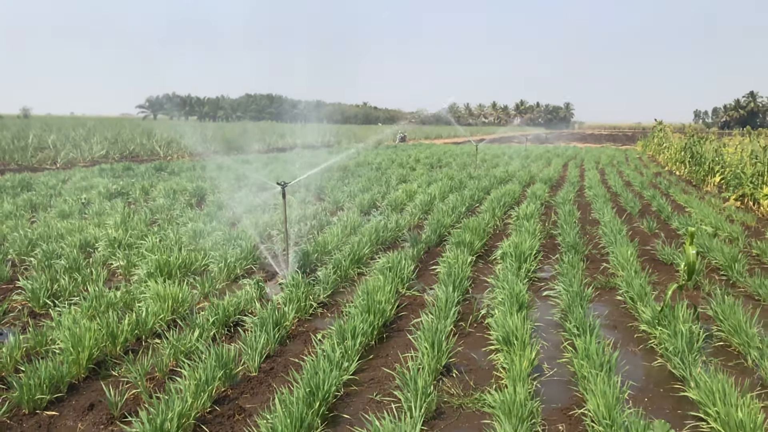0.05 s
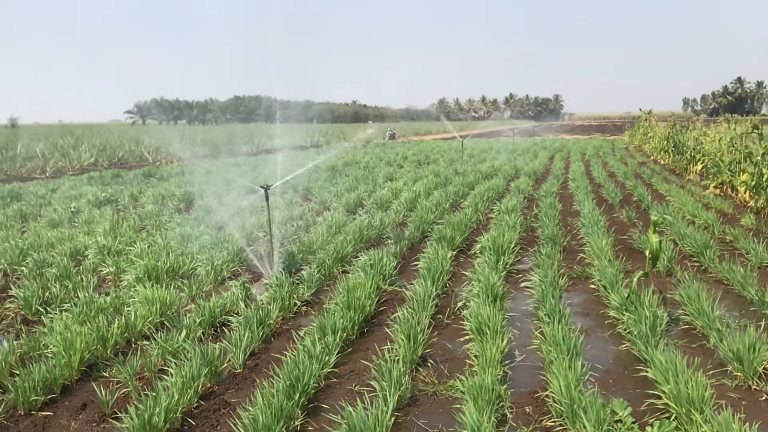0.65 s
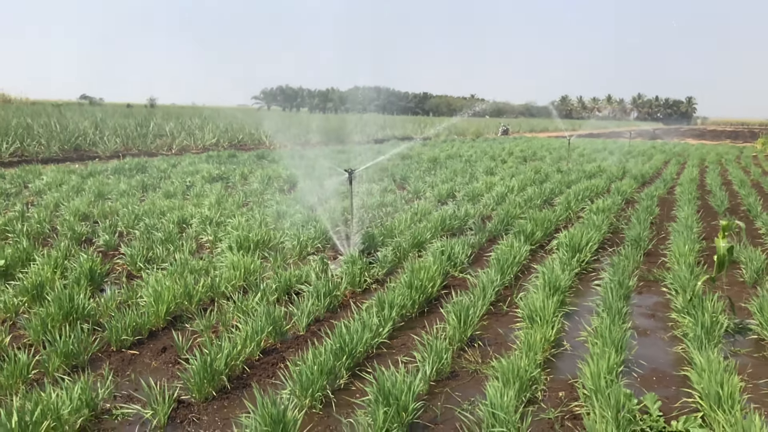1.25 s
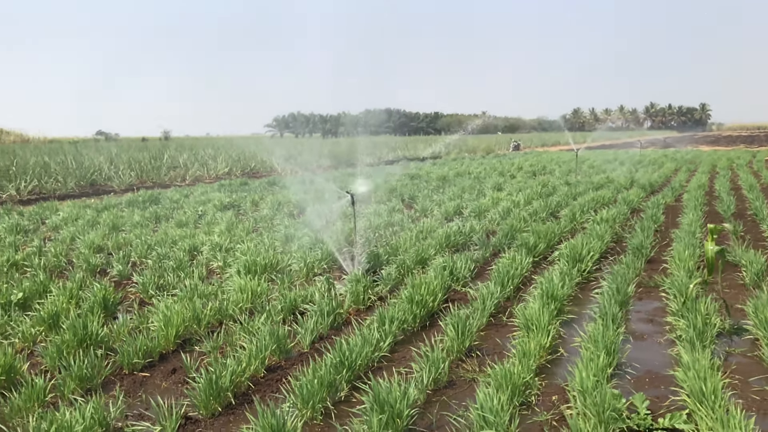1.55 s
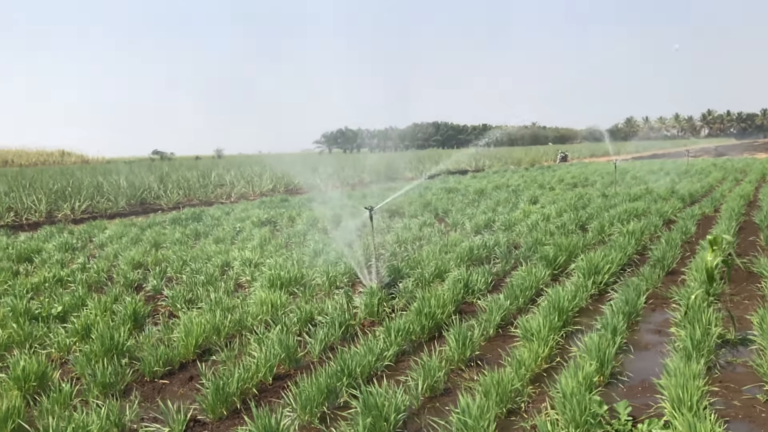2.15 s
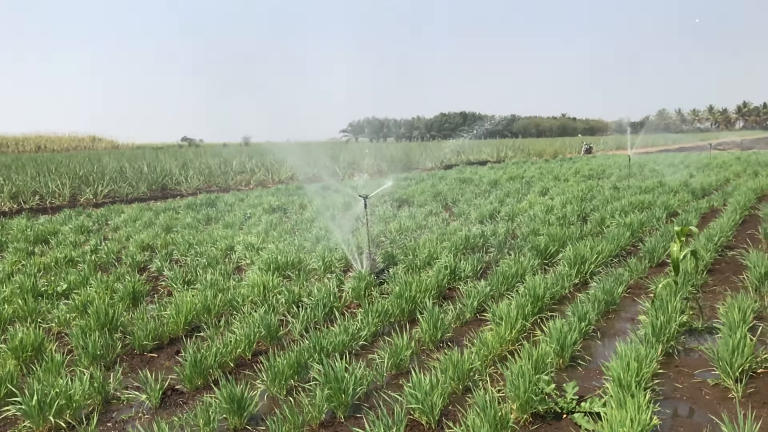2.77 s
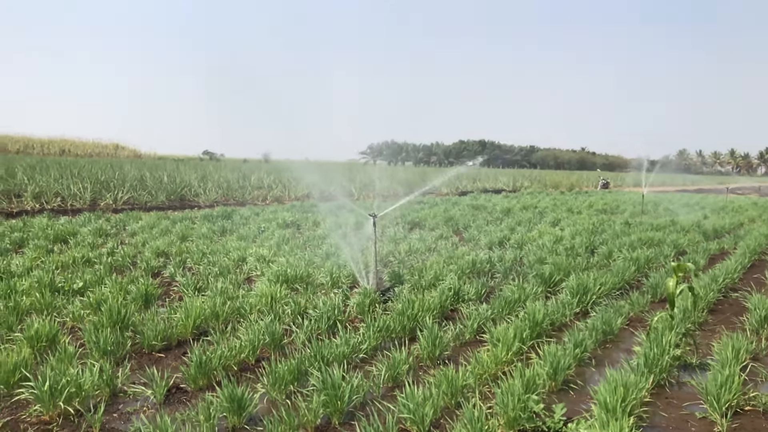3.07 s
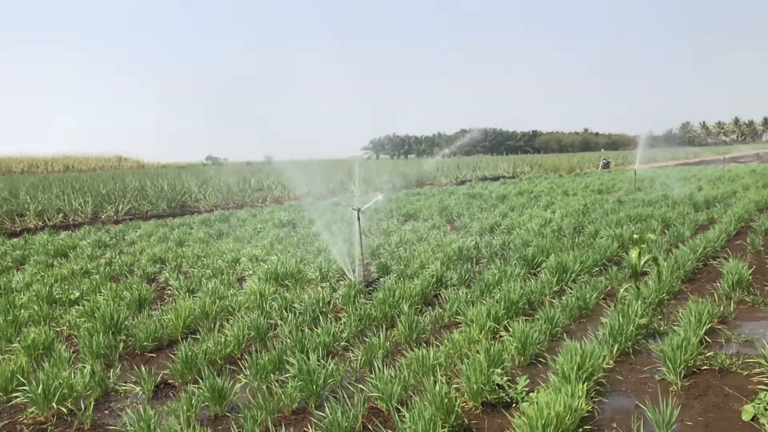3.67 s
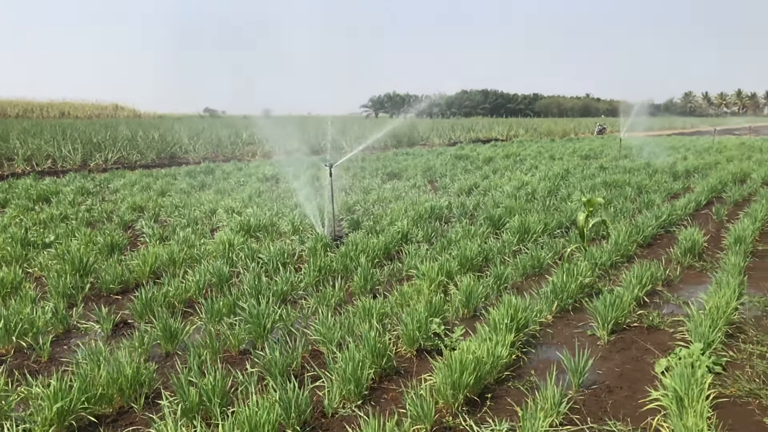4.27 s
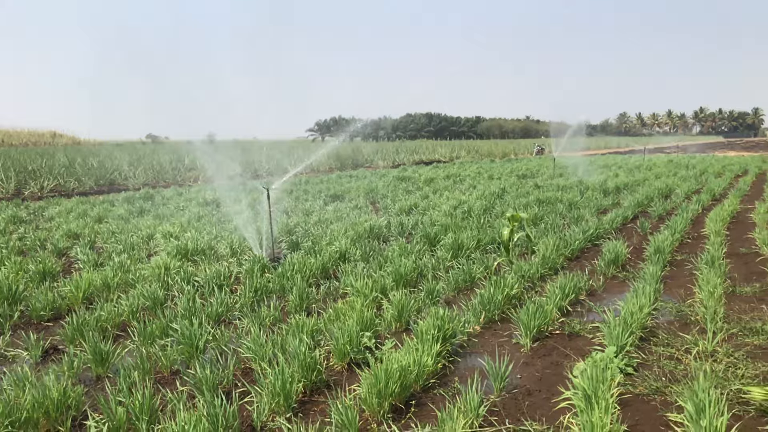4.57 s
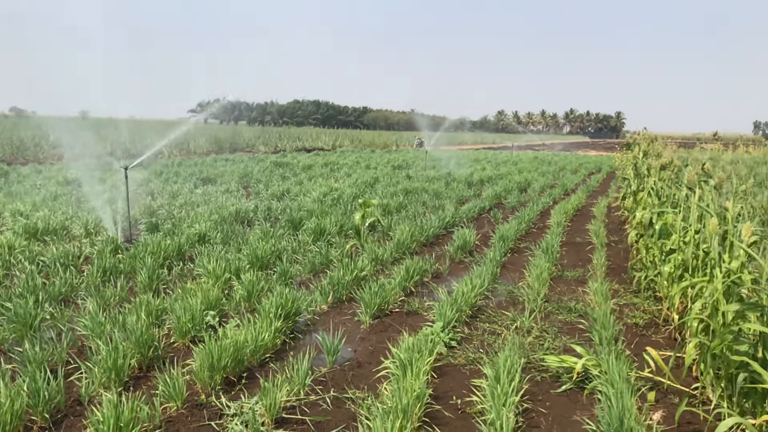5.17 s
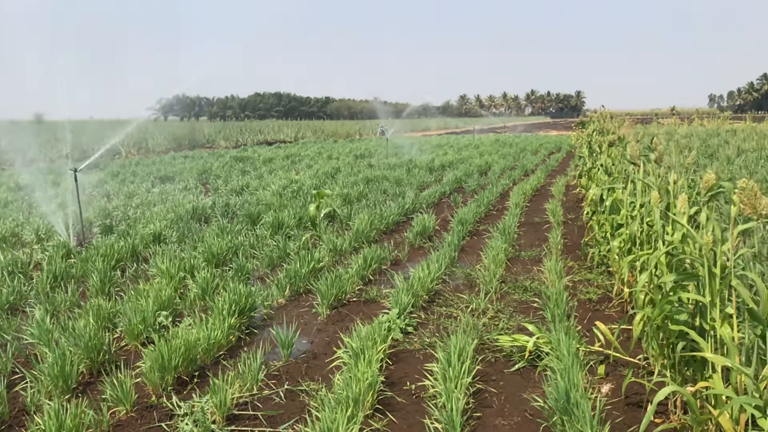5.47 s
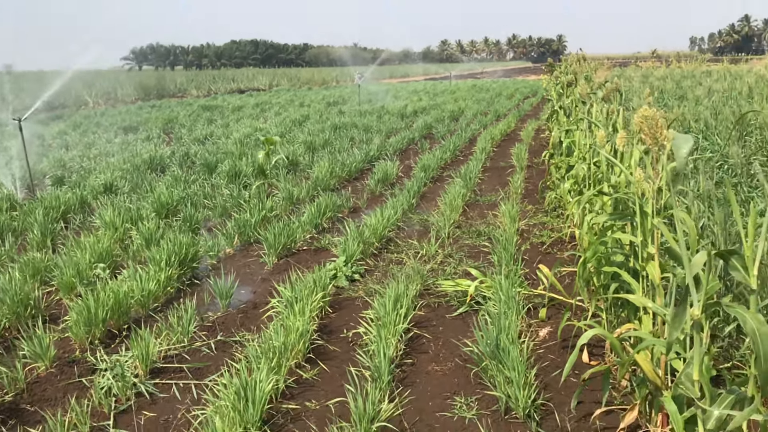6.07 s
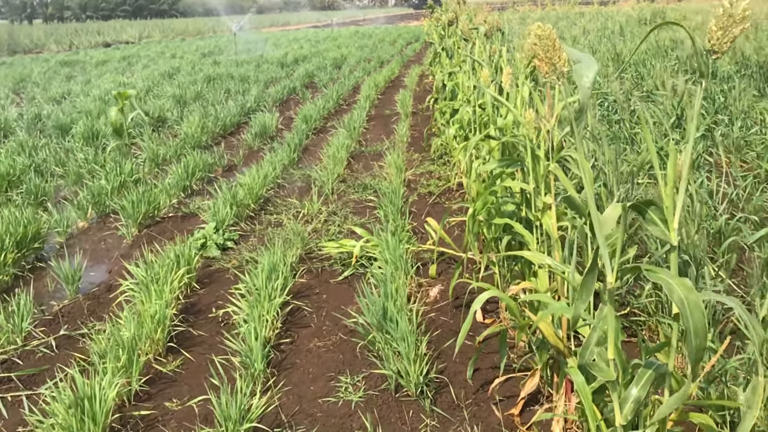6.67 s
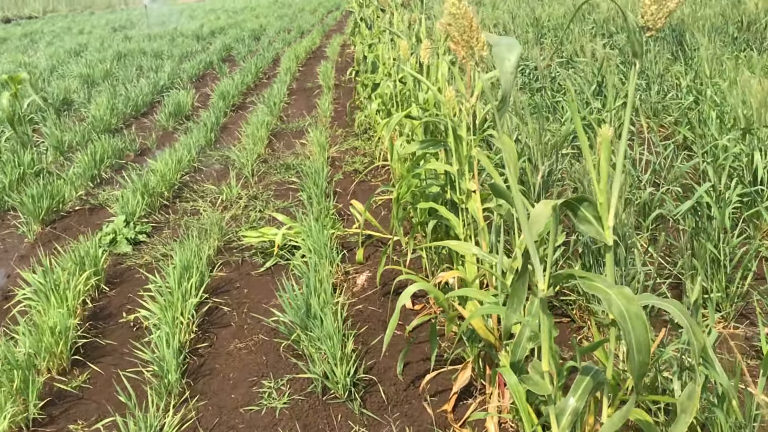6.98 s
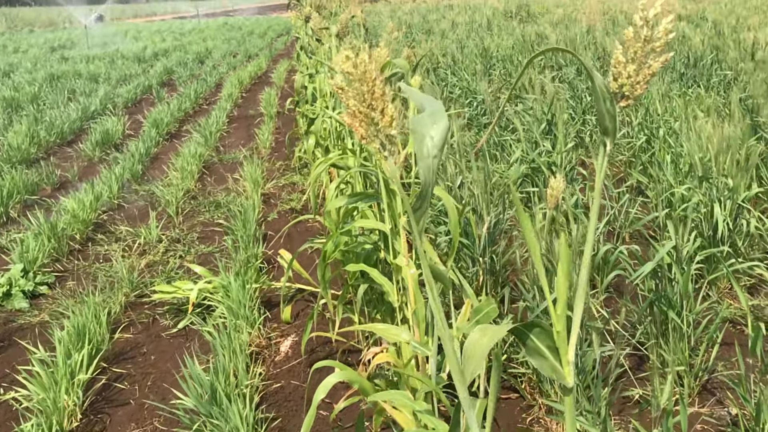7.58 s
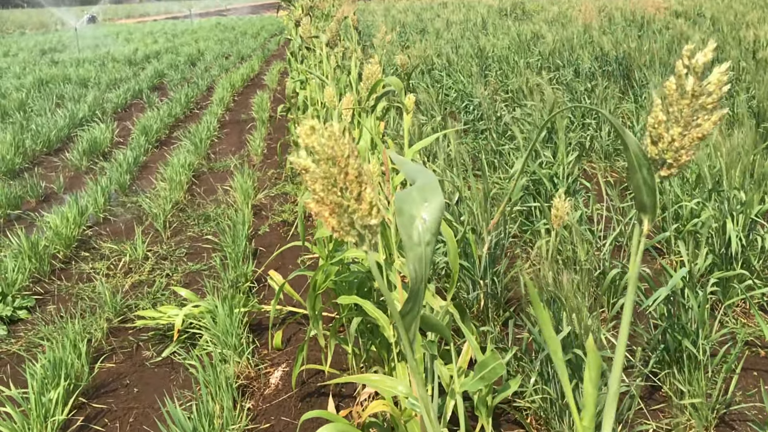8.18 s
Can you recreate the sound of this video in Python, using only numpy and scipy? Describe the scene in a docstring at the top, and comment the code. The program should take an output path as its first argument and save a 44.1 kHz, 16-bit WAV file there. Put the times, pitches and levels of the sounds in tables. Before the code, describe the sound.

Regular sharp ticks and a watery hiss come from a field sprinkler, easing slightly as spray and a few heavy drops land on crops.

```python
"""An impact sprinkler waters a crop field: about four times a second its arm knocks into the hissing jet,
chops the water and knocks again, mirrored by the wet ground. Spray patters on leaves and a second
sprinkler ticks further off, over the low noise of open land. From 1.3 s light wind nudges the phone, and
from 2.9 s heavy drops land close by. As the walker carries the phone away, sprinkler and spray slowly
fade; from 5 s stray drops tick on the tall crop, and just after 7 s a leaf brushes past."""
import sys
import numpy as np
from scipy import signal
from scipy.fft import rfft, irfft
from scipy.io import wavfile
from scipy.ndimage import uniform_filter1d

SR = 44100
rng = np.random.default_rng(int(sys.argv[2]) if len(sys.argv) > 2 else 0)


def unload_wav(signal):
    """Save mono or channel-first audio to the path in sys.argv[1] as 16-bit WAV at rate SR, clipped to [-1, 1]."""
    wavfile.write(
        sys.argv[1],
        SR,
        np.round(np.clip(np.atleast_2d(signal).T, -1, 1) * 32767).astype(np.int16),
    )


N = 367353
T = np.arange(N) / SR

# the walk away from the sprinkler: time_s, distance_m
WALK_PATH = [(0, 5.75), (.43, 6.18), (1.3, 6.72), (2.1, 6.89), (4.7, 8.42), (5.6, 8.52), (6.5, 9.17),
             (7.6, 8.68), (8.33, 8.87)]


def sprinkler_arm(knock_gain_db=2, splash_gain_db=-16.5, skirt_db=-10, dwell_s=.015):
    """The arm grazes the jet, knocks, throws water sideways, knocks again and lets the drops scatter."""
    # the two knocks of each stroke, entering and leaving the jet: start_s, entry_db, exit_db
    strokes = [(.016, -36.5, -32), (.212, -34, -42), (.431, -41, -45), (.674, -36, -46), (.918, -42, -47),
               (1.161, -37, -43), (1.401, -30.5, -36), (1.635, -32, -35), (1.871, -40, -38),
               (2.114, -39, -46), (2.348, -35, -39), (2.59, -29.5, -48), (2.837, -35, -37),
               (3.069, -34, -31), (3.26, -37, -40), (3.495, -37, -45), (3.736, -35, -46), (3.977, -36, -38),
               (4.209, -41, -42), (4.44, -41, -52), (4.678, -36, -40), (4.909, -35, -37.5),
               (5.135, -42, -35), (5.365, -36, -42), (5.6, -34, -49), (5.841, -39, -47), (6.068, -41, -43),
               (6.308, -40, -48), (6.543, -41, -52), (6.771, -42, -36), (6.966, -35, -50),
               (7.195, -39.5, -42), (7.437, -41.5, -49), (7.675, -40, -50), (7.896, -47, -52),
               (8.118, -40, -42)]
    # tone of the metal knock: frequency_hz, relative_db
    knock_spectrum = [(400, -20), (1500, -11.5), (2600, -10.5), (4200, -2), (6300, 1), (9000, -3.5),
                      (12000, 0.5), (15500, -5)]
    # tone of the chopped water: frequency_hz, relative_db
    splash_spectrum = [(500, -13), (2000, -17), (3200, -11.5), (4500, -6), (6300, -0.5), (8700, 2),
                       (11500, -2), (14300, 3.5), (15700, -4)]
    # the sideways splash weakens as the head turns away: time_s, gain_db
    head_turn = [(0, -1.5), (1.8, 0.7), (3.1, 0), (4.2, 0), (4.9, -4), (5.8, -1.5), (8.33, -5)]
    cling_s, rise_s, fall_s = .0011, .0018, .0061  # body of the splash
    graze_s, scatter_s = .016, .017  # its softer, longer skirt
    blows, water = np.zeros(N), np.zeros(N)
    for start_s, entry_db, exit_db in strokes:
        near = slice(max(int((start_s - .05) * SR), 0), int((start_s + .1) * SR))
        since_entry = T[near] - start_s
        since_exit = since_entry - dwell_s
        blows[near] += undb(entry_db) * knock(since_entry) + undb(exit_db) * knock(since_exit)
        before, after = np.maximum(-since_entry, 0), np.maximum(since_exit - cling_s, 0)
        body = np.exp(-before / rise_s - after / fall_s)
        skirt = undb(skirt_db) * np.exp(-before / graze_s - after / scatter_s)
        water[near] += np.maximum(body, skirt)
    metal = colour(blows * rng.standard_normal(N), knock_spectrum)
    splash = colour(water * patter(per_second=14000, spread_db=3.5), splash_spectrum)
    splash_gain = undb(splash_gain_db + curve(head_turn)) * distance_gain()
    return undb(knock_gain_db) * metal + splash_gain * splash


def knock(t, cushion_s=.0013, fade_s=.0021):
    """Envelope of a blow at t = 0, its attack cushioned by water."""
    return np.exp(-np.maximum(-t, 0) / cushion_s - np.maximum(t, 0) / fade_s)


def ground_bounce(x, head_height_m=1.0, phone_height_m=1.4, dull_hz=11000, share_per_m=.076):
    """Wet soil returns a copy, sooner and stronger as the bounce flattens; leaves scatter its top."""
    distance_m = curve(WALK_PATH)
    lag_s = 2 * head_height_m * phone_height_m / distance_m / 343
    share = np.minimum(share_per_m * distance_m, 1)
    dulled = signal.sosfiltfilt(signal.butter(3, dull_hz, fs=SR, output="sos"), x)
    echo = np.interp(T - lag_s, T, dulled)
    return (x + share * echo) / np.hypot(1, share)


def jet(gain_db=-27.5, flutter_db=.9, grain=.77):
    """The jet hisses and breaks into fine droplets; its level flutters a little."""
    # tone of the hiss: frequency_hz, relative_db
    jet_spectrum = [(1000, -25.5), (3000, -11.5), (5000, -11), (6700, -8), (8800, -4.5), (11000, -4.5),
                    (12500, -3.5), (14400, 1), (15700, -7)]
    hiss = unit(rng.standard_normal(N) + grain * patter(per_second=2700, spread_db=2.5))
    return colour(hiss, jet_spectrum) * distance_gain() * undb(gain_db + flutter_db * wander(rate_hz=25))


def turning_away(x, neutral_m=7.23, top_db_per_m=-.5, body_db_per_m=-.94):
    """As the sprinkler head turns away during the walk, its hiss and knocks sound duller and thinner."""
    extra_m = curve(WALK_PATH) - neutral_m
    top = signal.sosfiltfilt(signal.butter(2, 10500, "highpass", fs=SR, output="sos"), x)
    body = resonate(x, hz=4450, width_hz=1100)
    return x + (undb(top_db_per_m * extra_m) - 1) * top + (undb(body_db_per_m * extra_m) - 1) * body


def spray(gain_db=-33, plop_db=-10, falloff=1.38):
    """Spray ticks on leaves and mud, larger drops ring the leaves briefly; the walk leaves it behind."""
    # tone of the fine ticks: frequency_hz, relative_db
    spray_spectrum = [(400, -25), (1000, -4), (1800, 1.5), (2200, -0.5), (3000, -3.5), (4500, -6),
                      (8000, -14), (15000, 0)]
    ticks = colour(patter(per_second=5000, spread_db=1), spray_spectrum)
    leaf_hz = np.geomspace(1200, 7000, num=8)
    plops = sum(resonate(patter(per_second=22, spread_db=3.5), hz, hz / 4) for hz in leaf_hz)
    return (ticks + undb(plop_db) * unit(plops)) * undb(gain_db) * distance_gain() ** falloff


def heavy_drops(all_splash_hz=5200):
    """Heavy drops and taps nearby: a few damped cycles, roughened by their splash."""
    # close impacts: start_s, level_db, pitch_hz, fade_cycles
    impacts = [(2.9105, -30.5, 2750, 14), (3.1662, -36.5, 368, 3.7), (3.7232, -24, 1100, 2.8),
               (3.762, -35, 1880, 12), (5.082, -34, 2090, 8.5), (6.002, -41, 356, 3.7),
               (6.492, -35, 6000, 14), (6.589, -35, 940, 6.3), (6.955, -30, 2600, 4.4),
               (7.25, -38, 330, 3.8)]
    out, t = np.zeros(N), T[:2048]
    for start_s, level_db, pitch_hz, fade_cycles in impacts:
        cycles = t * pitch_hz
        envelope = (1 - np.exp(-cycles)) * np.exp(-2.5 * cycles / fade_cycles)
        ring = np.sin(2 * np.pi * cycles)
        splash = band(rng.standard_normal(len(t)), pitch_hz, width_hz=.55 * pitch_hz)
        share = min(pitch_hz / all_splash_hz, 1)  # higher drops are more splash than ring
        add(out, start_s, undb(level_db) * envelope * ((1 - share) * ring + share * splash))
    return out


def far_sprinkler(gain_db=-51, scatter_db=1.6, period_s=.233, jitter_s=.008, dwell_s=.021, edge_s=.003):
    """A second sprinkler further off keeps its own pace: each stroke is a soft, short, blurred spatter."""
    # tone of the distant spatter: frequency_hz, relative_db
    spatter_spectrum = [(1500, -23), (3500, -7.5), (6000, 1.5), (8500, 7), (11000, 5), (15000, -8)]
    water = np.zeros(N)
    t = np.arange(-1024, 3072) / SR
    outside_jet_s = np.maximum(-t, 0) + np.maximum(t - dwell_s, 0)
    stroke = np.exp(-outside_jet_s / edge_s)
    for beat_s in np.arange(.16, N / SR, period_s):
        lateness, strength = rng.standard_normal(2)
        add(water, beat_s + jitter_s * lateness + t[0], undb(scatter_db * strength) * stroke)
    return undb(gain_db) * colour(water * patter(per_second=7800, spread_db=1), spatter_spectrum)


def wind(rock_hz=55.4, eddy_band_hz=(75, 150)):
    """Each puff rocks the air at the microphone port for a few uneven cycles, with finer eddies on top."""
    # puffs of wind: centre_s, level_db, half_length_s, eddy_relative_db
    puffs = [(1.299, -38.5, 0.0081, -22), (1.361, -51, 0.089, -8), (1.808, -42, 0.022, -8),
             (3.386, -46.5, 0.021, 2.5), (3.667, -53.5, 0.057, -13), (4.52, -56.5, .12, -7),
             (4.582, -43.5, .01, -19), (7.019, -60.5, 0.16, -4.5)]
    out = np.zeros(N)
    wobble = .5 * wander(rate_hz=50)
    eddy_filter = signal.butter(3, eddy_band_hz, "bandpass", fs=SR, output="sos")
    eddies = unit(signal.sosfilt(eddy_filter, rng.standard_normal(N)))
    for centre_s, level_db, half_length_s, eddy_db in puffs:
        near = np.abs(T - centre_s) < 4 * half_length_s
        t = T[near] - centre_s
        swell = np.exp(-.5 * (t / half_length_s) ** 2)
        swing = np.sqrt(2) * np.sin(2 * np.pi * (rock_hz * t + rng.random()) + wobble[near])
        out[near] += undb(level_db) * swell * (swing + undb(eddy_db) * eddies[near])
    return out


def leaf_brush(centre_s=7.16, half_length_s=.031, level_db=-59):
    """A leaf brushes past the walker in one grainy swish."""
    swish = band(patter(per_second=3200, spread_db=2.5), hz=1350, width_hz=700)
    return undb(level_db) * np.exp(-.5 * ((T - centre_s) / half_length_s) ** 2) * swish


def stray_drops(start_s=5.0, level_db=-70):
    """Once the walker nears the tall crop, stray drops tick on its leaves."""
    ticks = band(patter(per_second=25, spread_db=2.5), hz=6000, width_hz=2200)
    return undb(level_db) * ticks * (T > start_s)


def open_land(gain_db=1.48, waver_db=.81, echo_share=.33, drone_db=-63):
    """Far-off noise of the open land, hollowed by its reflection, with a low wavering drone."""
    # tone of the far-off noise: frequency_hz, relative_db
    land_spectrum = [(25, -6.5), (50, 7), (90, 1.5), (150, 1), (270, 5), (460, -3), (650, 0.55), (830, 0),
                     (1040, -2), (1400, -5), (2100, -13), (5000, -20.5)]
    # slow drift of that noise and its reflection: time_s, gain_db, echo_delay_ms
    drift = [(0, -56, 1.68), (.7, -56.5, 1.72), (1.7, -57.5, 1.89), (4, -59, 1.85), (8.33, -58.5, 1.9)]
    air = colour(rng.standard_normal(N), land_spectrum)
    echo = np.interp(T - curve(drift, column=2) / 1000, T, air)
    drone = band(rng.standard_normal(N), hz=49.8, width_hz=11)
    air_gain = undb(gain_db + curve(drift) + waver_db * wander(rate_hz=4))
    return air_gain * (air + echo_share * echo) + undb(drone_db) * drone


def distance_gain():
    """Sound spreads out, so its amplitude falls with distance from the sprinkler."""
    return 1 / curve(WALK_PATH)


def undb(db):
    """Decibels to gain."""
    return 10 ** (np.asarray(db) / 20)


def unit(x):
    """Scale to rms 1."""
    return x / np.std(x)


def curve(rows, column=1):
    """One column of a table, joined by straight lines in time."""
    rows = np.array(rows)
    return np.interp(T, rows[:, 0], rows[:, column])


def colour(x, spectrum, size=4096):
    """Minimum-phase EQ with the given spectrum; white noise keeps its power."""
    hz, db = np.transpose(spectrum)
    bins_hz = np.linspace(1, SR / 2, size // 2 + 1)
    gain = undb(np.interp(np.log(bins_hz), np.log(hz), db))
    cepstrum = irfft(np.log(gain))
    cepstrum[1:size // 2] *= 2
    cepstrum[size // 2 + 1:] = 0
    response = irfft(np.exp(rfft(cepstrum)))
    return signal.fftconvolve(x, response / np.linalg.norm(response))[:N]


def resonate(x, hz, width_hz):
    """One resonance, gain 1 at its centre."""
    return signal.lfilter(*signal.iirpeak(hz, hz / width_hz, fs=SR), x)


def band(x, hz, width_hz):
    """The same resonance twice, for steeper sides; rms 1."""
    return unit(resonate(resonate(x, hz, width_hz), hz, width_hz))


def wander(rate_hz):
    """Smoothed random steps; spread 1."""
    hold = int(SR / rate_hz)
    steps = rng.standard_normal(2048)[np.arange(N) // hold % 2048]
    return unit(uniform_filter1d(uniform_filter1d(steps, hold), hold))


def patter(per_second, spread_db):
    """Random tiny impacts, a few much larger than the rest; rms 1."""
    hits = rng.random(N) < per_second / SR
    sizes = np.minimum(rng.exponential(size=N), 5)
    return unit(hits * undb(spread_db * sizes) * rng.choice([-1, 1], N))


def add(out, start_s, sound):
    """Mix a short sound in at start_s."""
    i = max(int(start_s * SR), 0)
    out[i:i + len(sound)] += sound[:max(N - i, 0)]


def scene():
    """All sources meet at one microphone."""
    sprinkler = turning_away(ground_bounce(sprinkler_arm()) + jet())
    water = sprinkler + far_sprinkler() + spray() + stray_drops() + heavy_drops()
    mono = water + leaf_brush() + open_land() + wind()
    return np.array([mono, mono])


def record(dry):
    """The microphone port carves narrow dips into the treble; the phone cuts the top above 15.8 kHz."""
    # notches of the port: centre_hz, width_hz, gain_db
    port_dips = [(4940, 330, -3), (7690, 600, -4), (10460, 1120, -5.5)]
    for centre_hz, width_hz, gain_db in port_dips:
        dry = dry + (undb(gain_db) - 1) * resonate(dry, centre_hz, width_hz)
    return signal.sosfilt(signal.ellip(12, .1, 80, 15800, fs=SR, output="sos"), dry)


dry = scene()
out = record(dry)
unload_wav(out)
```